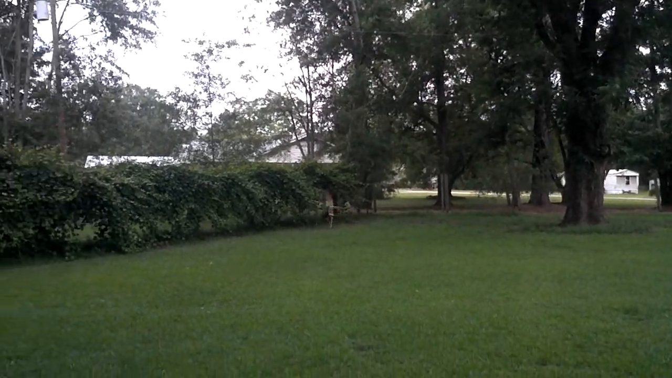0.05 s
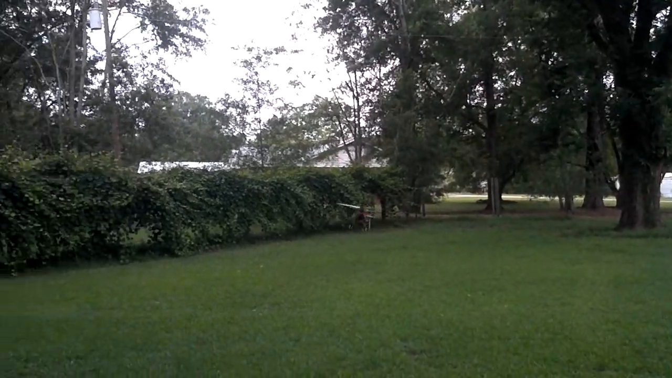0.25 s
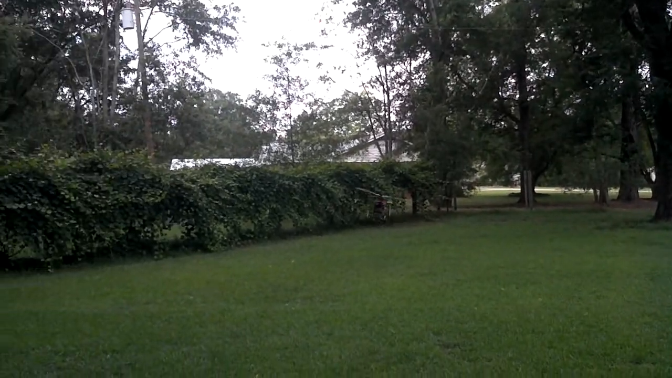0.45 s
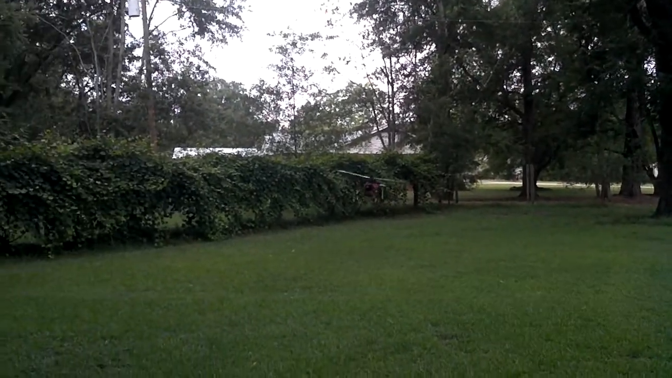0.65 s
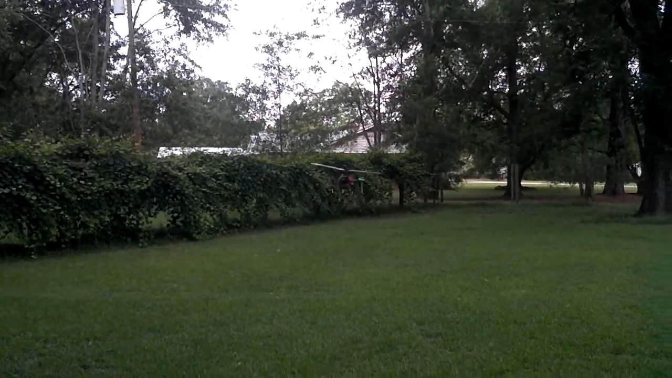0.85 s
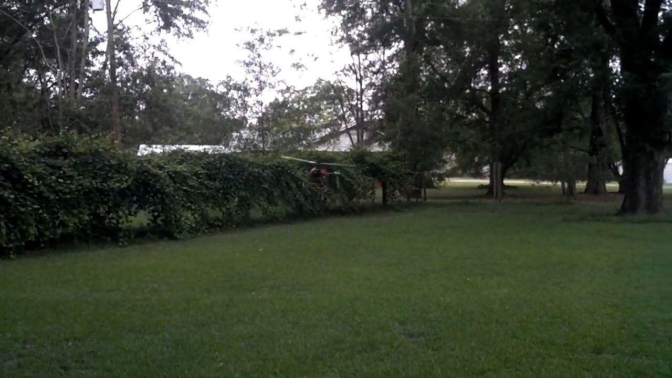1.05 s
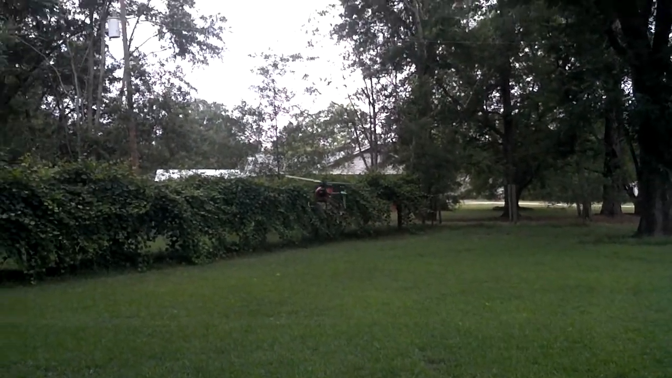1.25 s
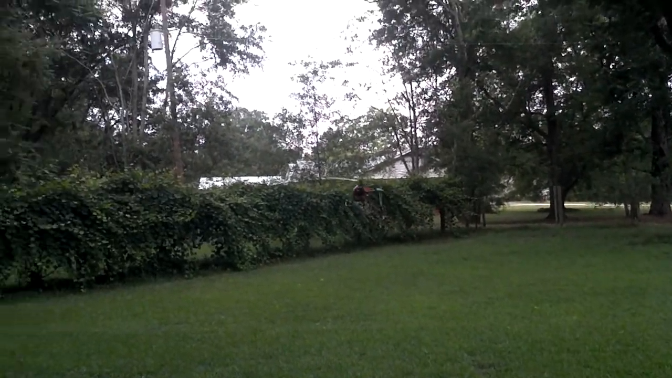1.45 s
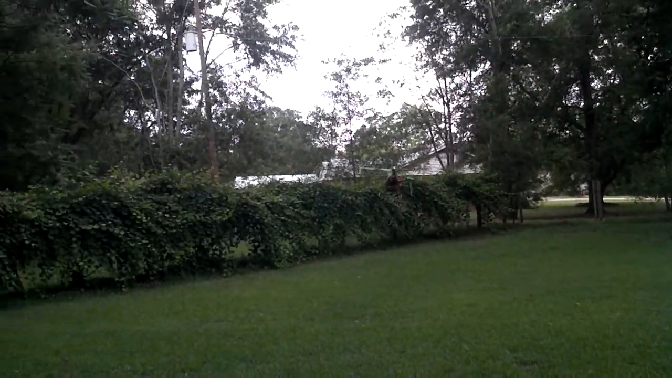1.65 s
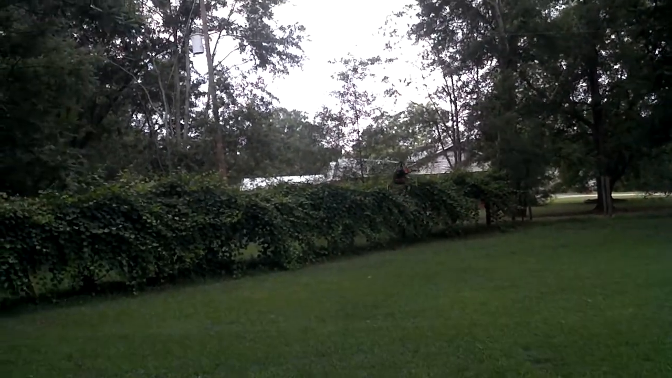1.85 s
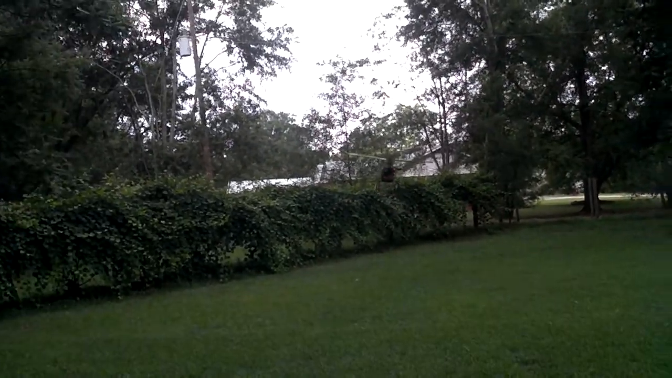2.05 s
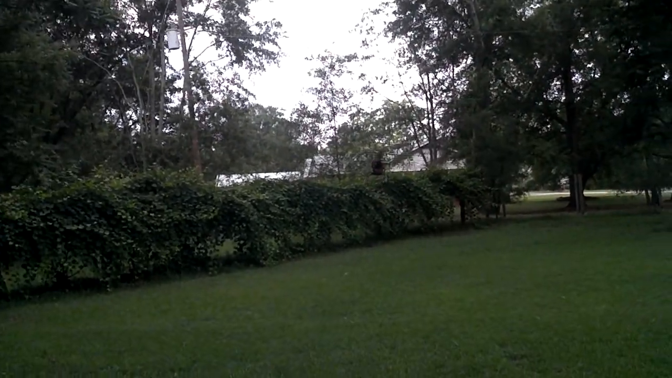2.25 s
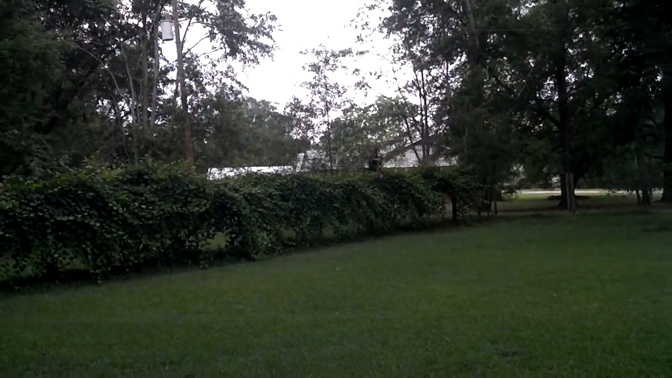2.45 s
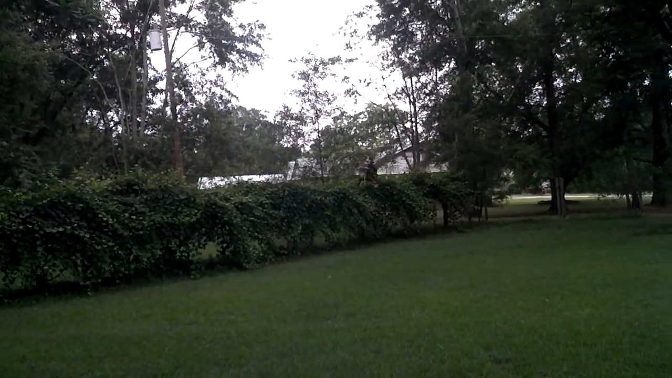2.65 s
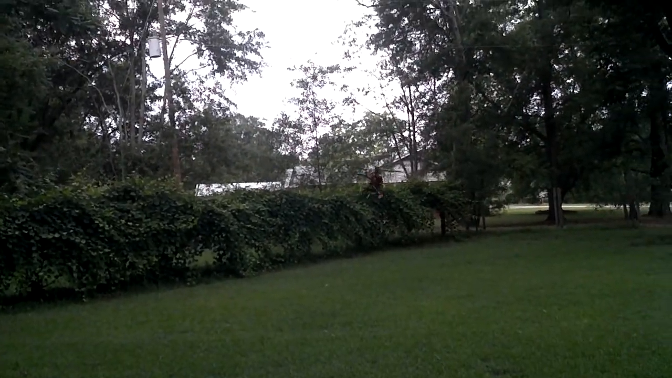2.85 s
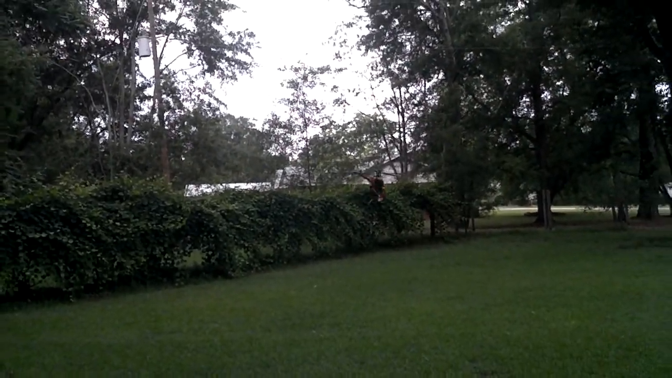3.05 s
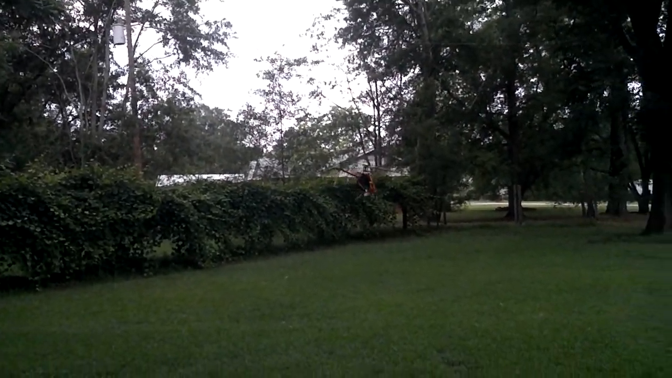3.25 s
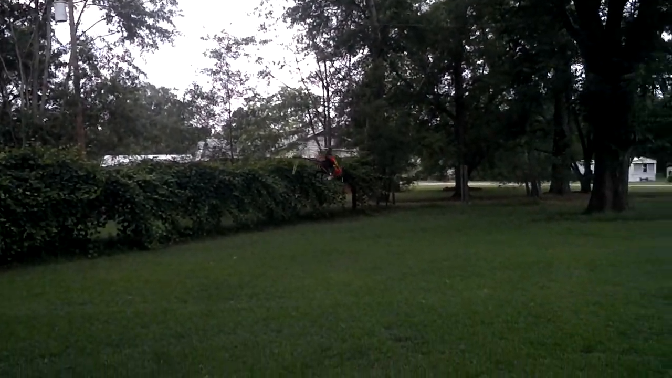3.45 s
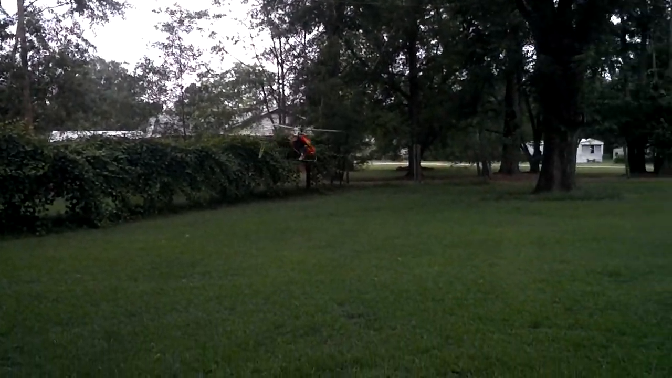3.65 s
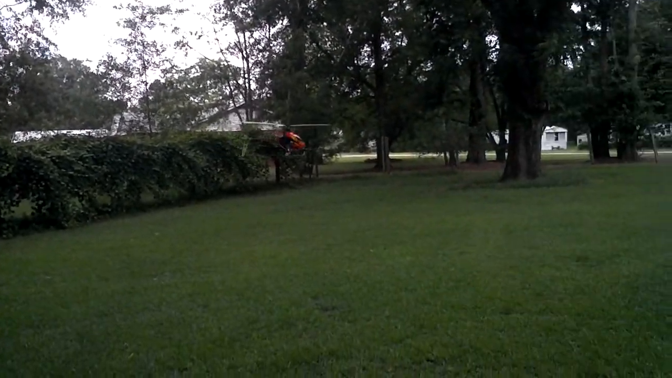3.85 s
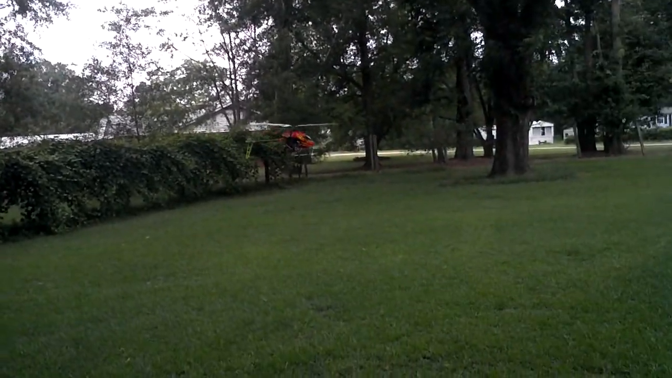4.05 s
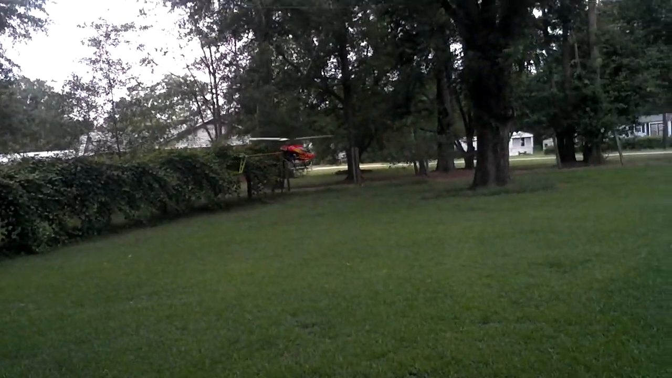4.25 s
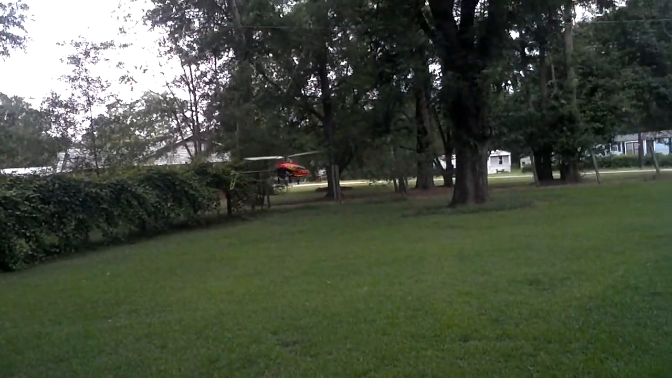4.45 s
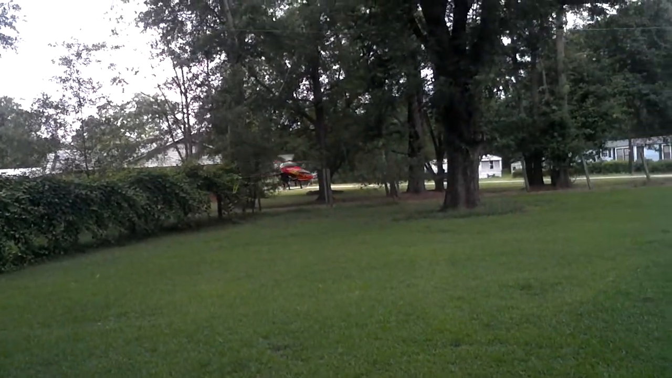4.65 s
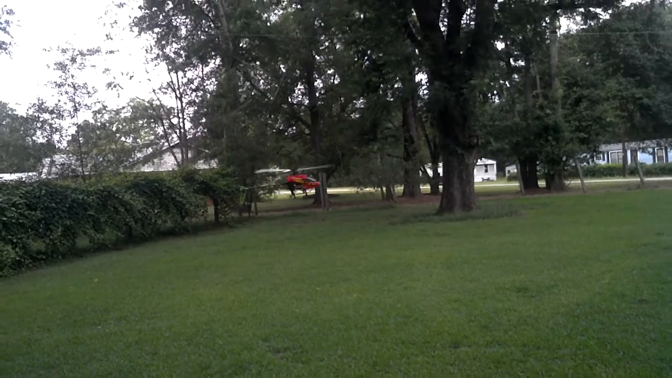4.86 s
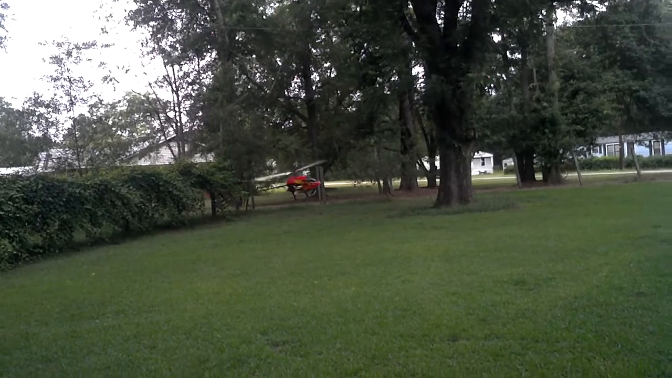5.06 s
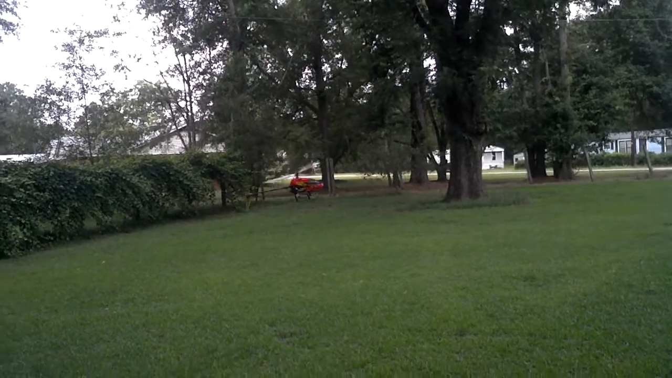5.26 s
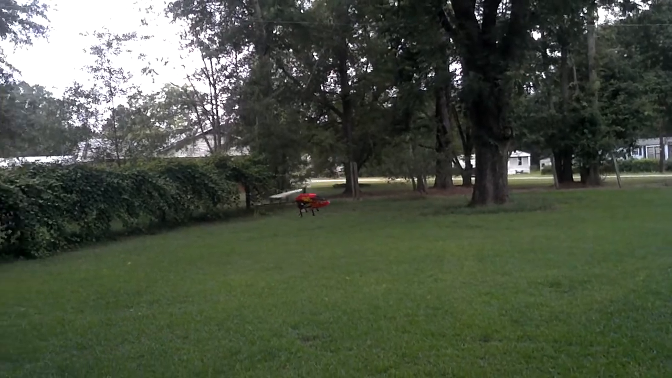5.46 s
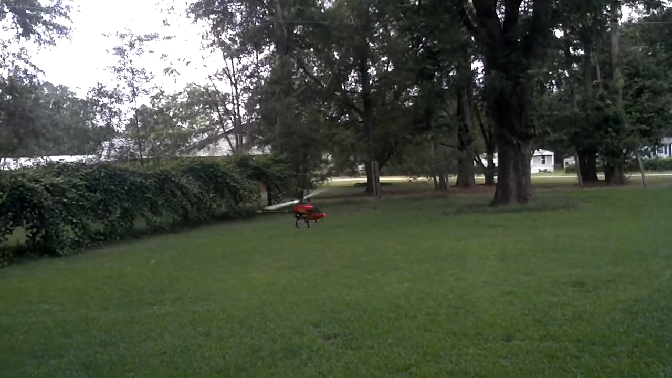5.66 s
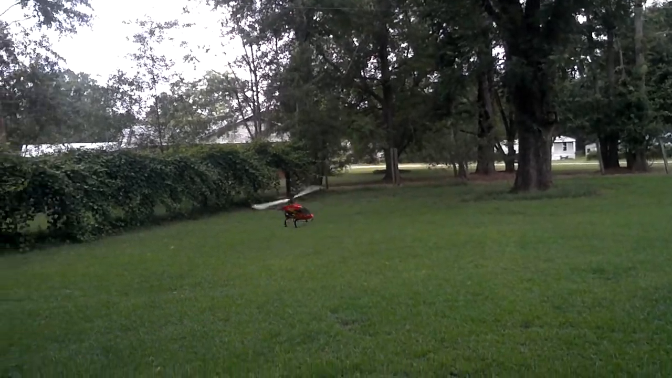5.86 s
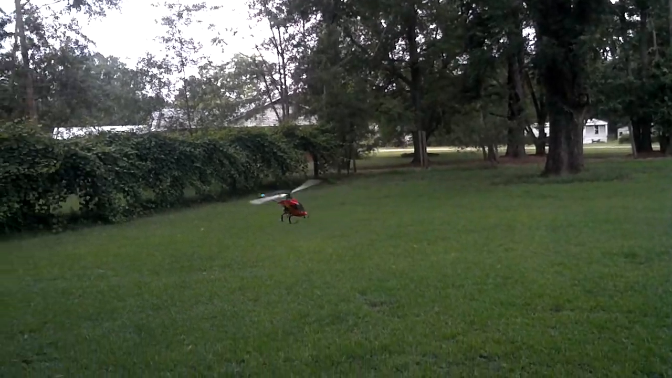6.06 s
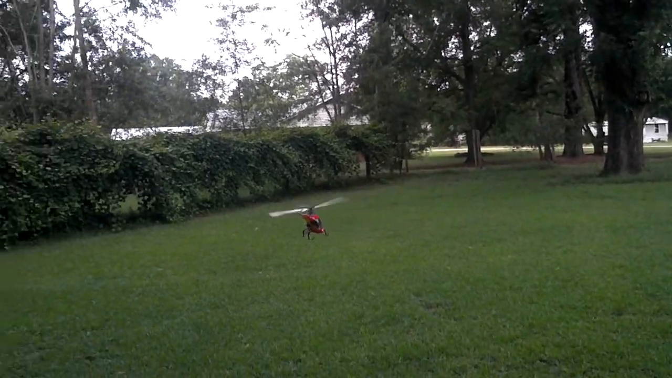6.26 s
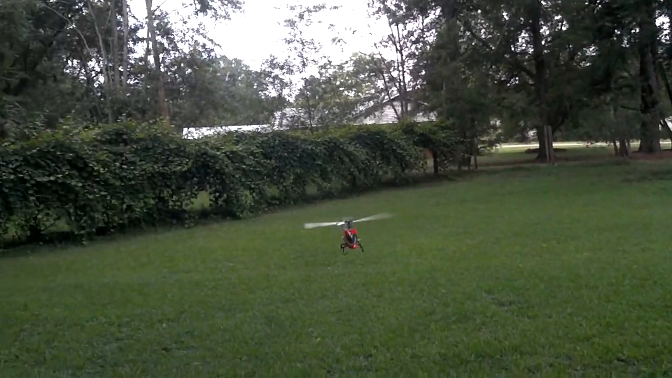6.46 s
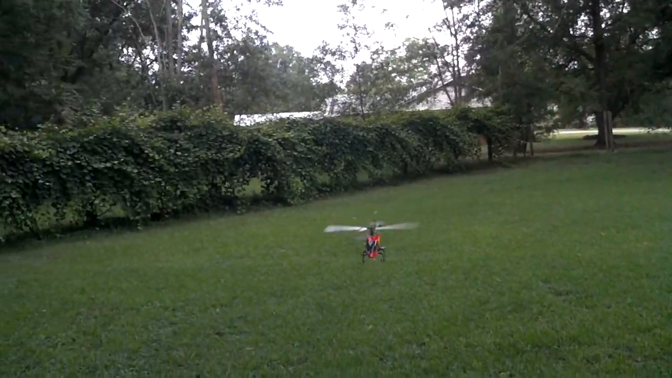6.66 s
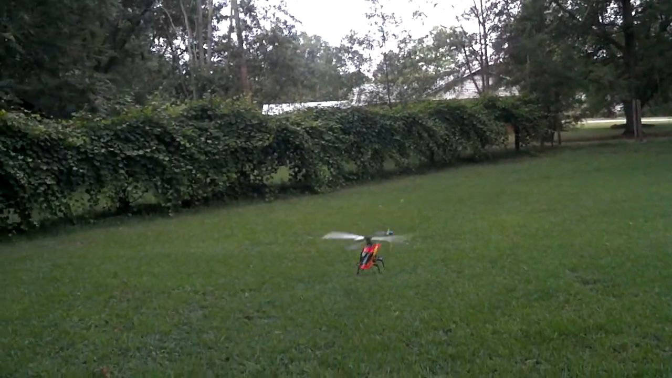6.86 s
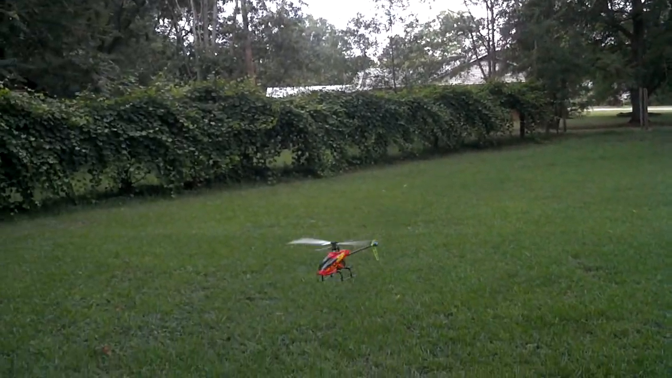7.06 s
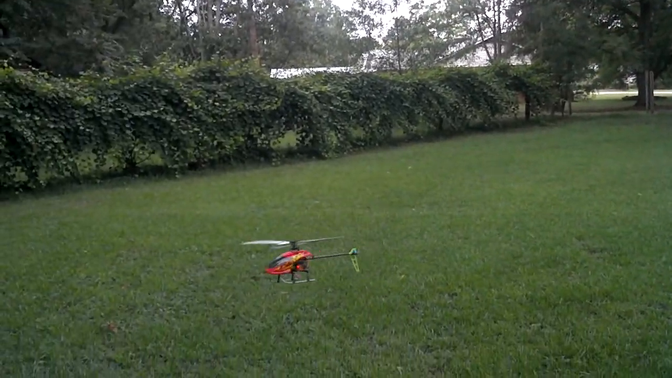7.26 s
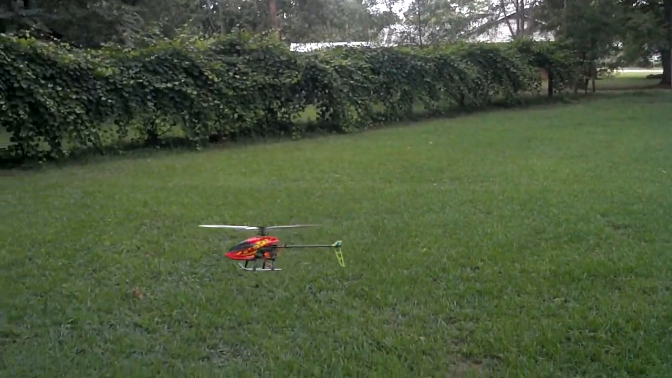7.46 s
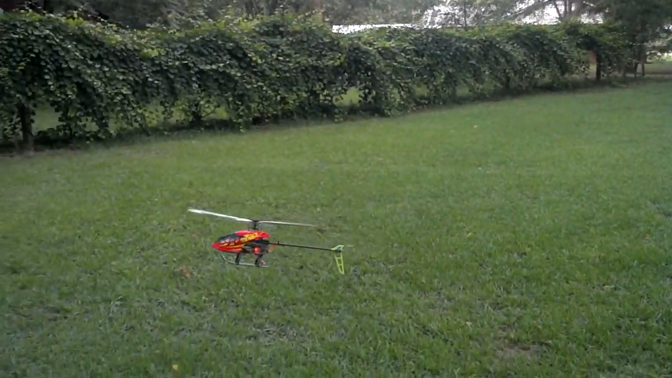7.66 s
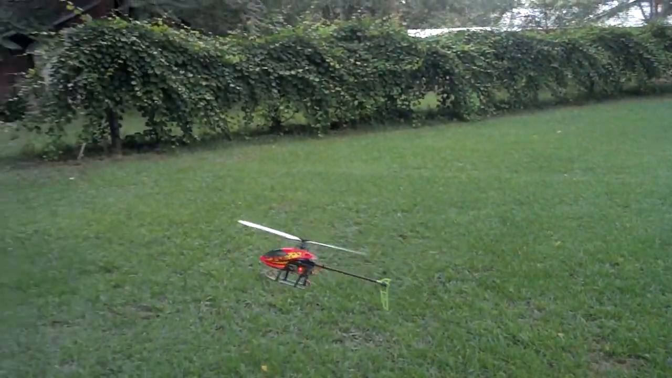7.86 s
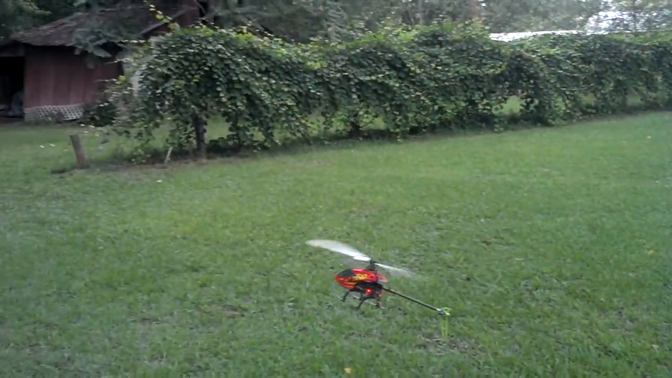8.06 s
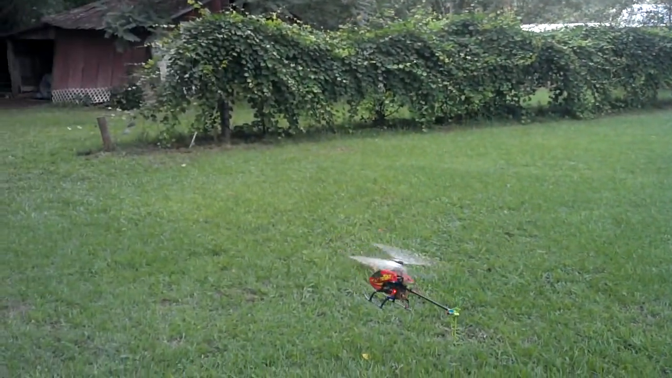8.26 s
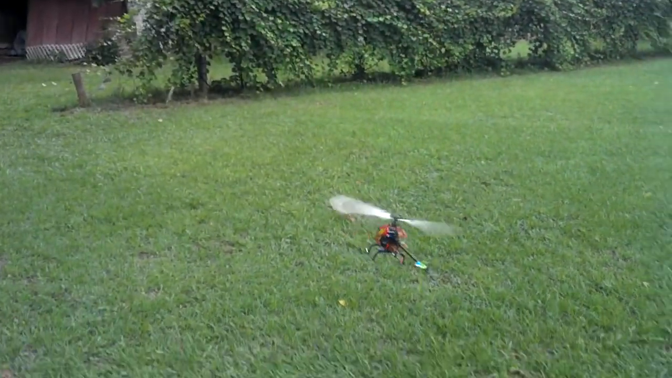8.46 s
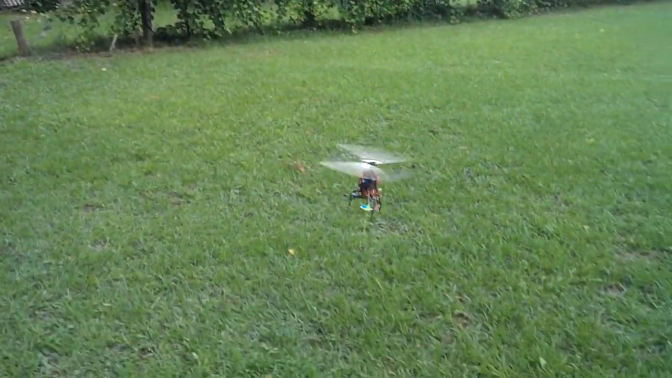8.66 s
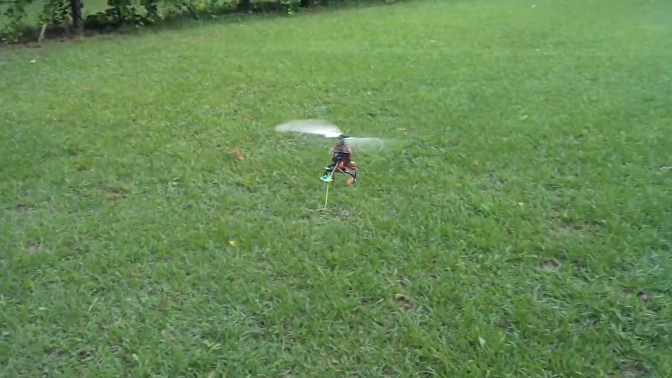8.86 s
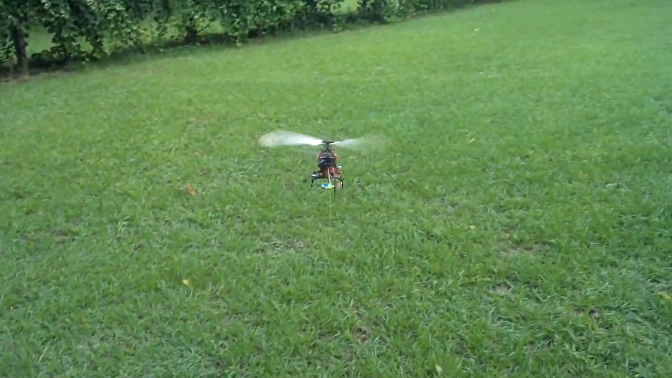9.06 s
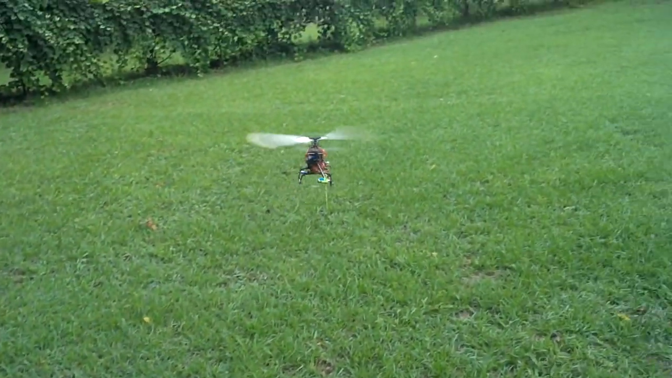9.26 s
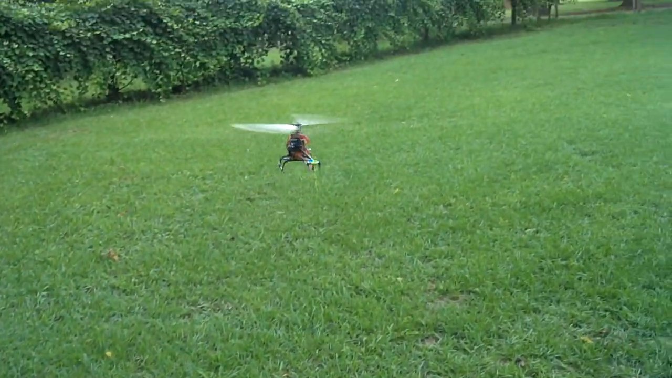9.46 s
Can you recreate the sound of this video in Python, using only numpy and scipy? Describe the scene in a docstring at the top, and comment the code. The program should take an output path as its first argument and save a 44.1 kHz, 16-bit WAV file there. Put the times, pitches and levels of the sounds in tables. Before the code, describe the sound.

Outdoors in a quiet yard, a small electric model helicopter flies continuously. Its shrill, raspy gear whine throbs rapidly with the rotor, while a separate tail-motor hum wavers up and down. It swells, thins as it drifts off, then comes in close and bright, with brief low puffs of air on the microphone and stronger blade swish at the end.

```python
"""A shrill, throbbing whine drifts off and comes close: a small electric model helicopter over a lawn.
Its motor pinion meshes with the main gear, whose uneven pressure makes the whine throb once a rotor turn.
A separate tail motor hums up and down as it holds the heading, and the main blades swish.
Hedge and trees answer faintly, a quiet yard lies behind, and the downwash puffs on the microphone."""
import sys
import numpy as np
from scipy import signal
from scipy.fft import rfft, irfft, next_fast_len
from scipy.io import wavfile
from scipy.ndimage import map_coordinates

SR = 44100
rng = np.random.default_rng(int(sys.argv[2]) if len(sys.argv) > 2 else 0)


def wav_record(signal):
    """Record a signal, one row per channel, as 16-bit PCM in the file named by sys.argv[1]."""
    frames = np.transpose(np.atleast_2d(signal))
    bounded = np.clip(frames, -1, 1)
    # unit amplitude maps onto the largest positive 16-bit level
    quanta = np.round(bounded * 32767).astype(np.int16)
    wavfile.write(sys.argv[1], SR, quanta)


N = 419832

# how the tail rotor and fuselage face the listener: time_s, broadside (0 end-on to 1 broadside)
BROADSIDE = [(0.0, 0.47), (0.76, 0.01), (1.0, 0.5), (1.64, 0.078), (2.68, 0.28), (3.6, 0.76), (3.76, 0.52),
             (4.56, 0.94), (5.8, 0.64), (6.4, 0.75), (7.56, 0.99), (8.04, 0.16), (9.0, 0.32), (9.52, 0.57)]
# level curve of the main blades' wash, and the offset added to it: time_s, relative_db
WASH_LEVEL = [(0.0, -54), (0.92, -56.5), (1.16, -53), (1.64, -50.5), (1.88, -48), (2.4, -50), (2.96, -45),
              (5.2, -58), (6.88, -57), (7.24, -54), (8.24, -51), (8.48, -44.5), (9.0, -40.3), (9.52, -41.8)]
WASH_DB = 5
GEAR_TEETH, PINION_TEETH = 140, 9


def amp(db):
    """The decibel law: 20 dB is a factor of ten in amplitude."""
    return 10 ** (np.asarray(db) / 20)


def unit(x):
    """Normalisation to a root-mean-square of 1."""
    return x / np.sqrt(np.mean(x ** 2) + 1e-20)


def along(points, hz):
    """Interpolation of (frequency, value) points on a logarithmic frequency axis."""
    point_hz, values = np.transpose(points)
    return np.interp(np.log(hz + 1), np.log(point_hz + 1), values)


def curve(rows):
    """Linear interpolation of (time_s, value) rows to one value per sample."""
    time_s, values = np.transpose(rows)
    return np.interp(np.arange(N) / SR, time_s, values)


def wobble(rate):
    """Band-limited random modulation: a smooth curve through rate random knots a second."""
    knots = rng.standard_normal(int(N * rate / SR) + 4)
    coarse = np.arange(0, N, 16)
    return np.interp(np.arange(N), coarse, map_coordinates(knots, [coarse * rate / SR]))


def filtered(x, response):
    """Linear filtering: the spectrum of x times a complex response of frequency."""
    m = next_fast_len(N + SR // 2)
    return irfft(rfft(x, m) * response(np.fft.rfftfreq(m, 1 / SR)), m)[..., :N]


def coloured(x, spectrum):
    """Spectral shaping by (frequency_hz, level_db) points, normalised to rms 1."""
    return unit(filtered(x, lambda hz: amp(along(spectrum, hz))))


def angle(hz):
    """Phase in radians is the running integral of frequency."""
    return 2 * np.pi * np.cumsum(hz) / SR


def skirt(phase, rate):
    """Random quadrature modulation spreads a gliding carrier into noise about rate Hz wide."""
    return wobble(rate) * np.cos(phase) + wobble(rate) * np.sin(phase)


def line(phase, rough, rate):
    """A spectral line: a tone of rms 1 plus its noise skirt, scaled by rough."""
    return np.sqrt(2) * np.cos(phase) + rough * skirt(phase, rate)


def heard_db(end_on_db, broadside_db):
    """Distance and directivity set the level: nearness plus a gain with broadside view."""
    # nearness to the listener: time_s, relative_db
    nearness = [(0.0, -43), (0.52, -41), (1.04, -41), (1.6, -38), (3.08, -34.5), (3.72, -37), (4.6, -38.5),
                (5.64, -42.5), (6.56, -48.5), (7.4, -35.5), (7.88, -29), (8.12, -31.5), (8.32, -29.5),
                (8.64, -33), (8.76, -32.5), (9.52, -34)]
    return curve(nearness) + end_on_db + broadside_db * curve(BROADSIDE)


def frame_level():
    """Common radiation level (dB) of the gear rasp, chatter and motor lines, from distance and facing."""
    return heard_db(2.38, -2.4)


def mesh_whine(shaft, rotor):
    """Gear meshing: teeth sound at the tooth rate, modulated once a turn by an eccentric gear."""
    # whine at the tooth rate: time_s, relative_db
    whine_curve = [(0.0, -45.5), (0.48, -55.5), (0.82, -43.5), (0.9, -49), (1.03, -40), (1.14, -37),
                   (1.175, -44), (1.21, -36.5), (1.26, -48.5), (1.4, -47), (1.47, -39), (1.53, -44.5),
                   (1.62, -42), (1.72, -48.5), (1.9, -42), (2.08, -37.5), (2.4, -35), (2.7, -38.5),
                   (2.92, -36), (3.15, -40), (3.48, -32), (3.72, -37), (3.87, -37.5), (4.12, -41),
                   (4.44, -39), (4.84, -49.5), (4.96, -58), (5.32, -46), (5.6, -57), (5.76, -47),
                   (6.16, -61.5), (6.88, -51.5), (7.08, -60.5), (7.3, -41), (7.7, -40), (8.03, -31),
                   (8.12, -35.5), (8.2, -49), (9.52, -46)]
    # its octave: time_s, relative_db
    octave_curve = [(0.0, -41.5), (0.36, -34), (2.36, -28), (2.88, -38), (3.4, -29.5), (4.4, -33.5),
                    (5.04, -57), (5.68, -36), (6.44, -45), (6.96, -42.8), (7.56, -27.5), (7.76, -39),
                    (8.52, -22), (8.88, -33), (9.52, -25.5)]
    # once-a-turn throb: time_s, depth_db
    throb_curve = [(0, 3), (.4, 2), (1.0, 7.5), (1.2, 7.5), (1.32, 2.5), (1.47, 7.5), (1.85, 6), (2.12, 1),
                   (2.4, .8), (2.7, 4.4), (3.7, 5.2), (4.3, 4), (4.6, 1), (5.6, 1.5), (5.85, 6),
                   (7.45, 6.5), (7.8, 1.5), (8.0, 2.5), (8.15, 8), (8.5, 4), (9.52, 3)]
    flex_rad_per_db = .23  # phase bend of the whine for each dB of throb
    whine_db, octave_db = curve(whine_curve) + 2.06, curve(octave_curve) - 1.5
    throb_db = curve(throb_curve)
    # once a turn the teeth press harder and the pitch slides down,
    # then it snaps back and slides again, more weakly, on the far side; no two turns are alike
    turn = rotor - 1.8
    press = .7 * np.tanh(2.2 * np.cos(turn)) + .25 * np.cos(2 * turn)
    uneven_press = press * (.95 + .17 * wobble(20)) + .16 * wobble(36)
    throb = amp(throb_db * uneven_press - .05 * throb_db ** 2)
    flex = np.maximum(np.cos(turn), -.45 * np.cos(turn)) * (1 + .25 * wobble(28)) + .13 * wobble(90)
    mesh = PINION_TEETH * shaft + flex_rad_per_db * throb_db * flex + .08 * wobble(45)

    fundamental = throb * line(mesh, rough=.15, rate=280) + .22 * skirt(mesh, rate=420)
    octave_db = octave_db + 0.25 * press + 0.49 * np.cos(2 * rotor) + 1.75 * wobble(70)
    third_db = frame_level() - 25 - 9 * curve(BROADSIDE) + 2 * wobble(3) + 3 * press
    whine = amp(whine_db) * fundamental
    whine += amp(octave_db) * line(2 * mesh, rough=0.33, rate=220)
    return whine + amp(third_db) * line(3 * mesh, rough=2, rate=400)


def motor_and_bearings(shaft, rotor):
    """Rotating machinery sounds at multiples of shaft speed: poles, unbalance and bearings."""
    # hum of the three armature poles: time_s, level_db
    hum_curve = [(0.0, -63), (0.52, -64), (0.84, -51.5), (1.56, -60), (2.08, -48), (3.16, -40),
                 (3.72, -49.5), (4.36, -38.5), (5.6, -47.5), (5.84, -65.5), (7.76, -34.5), (8.12, -50),
                 (8.36, -41), (9.24, -45), (9.52, -43)]
    # shrill, rough bearing whine that swells as the motor slows: time_s, mean_level_db
    shrill_curve = [(0, -66), (4.2, -58), (4.6, -45), (5.1, -44), (5.6, -47), (6.1, -62), (9.52, -62)]
    # lesser lines: shaft_multiple, end_on_db (against the frame level), broadside_gain_db
    orders = [(4.5, -28, 0), (6, -30, 2), (6.75, -24, 0), (8, -29, 0), (11.25, -18, -5), (12, -18, -6),
              (13.5, -17, -2), (14.25, -14.5, -4), (15, -12, -3), (15.75, -18, 9), (17, -16, 2),
              (17.5, -15, 0), (18.5, -14, -3), (19, -11.5, -3), (20.25, -19, 2), (21, -21, 2),
              (21.67, -23, -4)]
    sound = amp(curve(hum_curve)) * line(3 * shaft, rough=0.17, rate=34)
    sound += amp(-63.5 + 1.5 * wobble(3)) * line(shaft, rough=.15, rate=20)  # unbalanced shaft
    # a bearing tone, loudest where the blade wash is loudest
    bearing_db = curve(WASH_LEVEL) + WASH_DB - 11 + 2 * wobble(3)
    sound += amp(bearing_db) * line(2.25 * shaft, rough=.4, rate=30)
    rattling = shaft + .04 * wobble(60)  # play in the bearings (radians) blurs the high lines
    frame_db, broadside = frame_level(), curve(BROADSIDE)
    for multiple, end_on_db, gain_db in orders:
        level_db = frame_db + end_on_db + gain_db * broadside + 2 * wobble(1.985) + 2 * wobble(25)
        sound += amp(level_db) * np.sqrt(2) * np.cos(multiple * rattling)
    shrill_db = curve(shrill_curve) + 2.5 * np.cos(rotor)
    return sound + amp(shrill_db) * skirt(7 * 2.25 * shaft, rate=230)


def tooth_chatter(shaft, rotor):
    """Amplitude-modulated narrow-band noise: hiss glides with the motor and bursts once a gear turn."""
    # bands: shaft_multiple, width_hz (approximate), end_on_db (against the frame level),
    # broadside_gain_db, burst_depth_db
    bands = [(15.75, 300, -18, 6, 4), (17.6, 350, -11, -4, 2), (18.5, 420, -8, -9, 2),
             (20.8, 450, -15, -7, 2)]
    frame_db, broadside = frame_level(), curve(BROADSIDE)
    sound = np.zeros(N)
    for multiple, width_hz, end_on_db, gain_db, burst_db in bands:
        steady_db = frame_db + end_on_db + gain_db * broadside
        level_db = steady_db + burst_db * np.cos(rotor) + 1.5 * wobble(3) + 2 * wobble(40)
        sound += amp(level_db) * skirt(multiple * shaft, rate=width_hz)
    return sound


def tooth_rasp(rotor):
    """Surface roughness excites the frame: part of the rasp repeats with every turn of the gear."""
    # spectrum of the rasp: frequency_hz, relative_db
    rasp_spectrum = [(200, -108), (2000, -7), (4400, -28), (5400, -12), (6000, -3), (6500, -2.5), (7100, 0),
                     (7700, 0.5), (8300, -1.5), (8900, -5.5), (10000, -14), (11000, -24), (11800, -15),
                     (15800, -35)]
    flaws = rng.standard_normal(GEAR_TEETH * 10)  # ten points a tooth
    position = rotor / (2 * np.pi) % 1 * len(flaws)
    repeating = map_coordinates(flaws, [position], mode="grid-wrap")
    scrape_db = 0.12 * np.cos(rotor - 1.2) + 1.2 * np.cos(2 * rotor) + 1.4 * wobble(70)
    scrape = (repeating + rng.standard_normal(N)) * amp(scrape_db)
    # the frame rings near 6.4 kHz in short bursts as the gear comes round
    ring_spectrum = [(5400, -64), (6150, -5.0), (6450, 11), (6750, -15.0), (7600, -68)]
    ring = coloured(rng.standard_normal(N), ring_spectrum)
    frame_db = frame_level()
    ring_db = frame_db - 14 + 6.2 * np.cos(rotor + 1.5) + 2.5 * wobble(40)
    return amp(ring_db) * ring + amp(frame_db - 1.2) * coloured(scrape, rasp_spectrum)


def tail_rotor(rotor):
    """Blade-passing harmonics of a small direct-drive propeller, roughened by the main blades' wake."""
    # speed as it works to hold the heading: time_s, blade_passing_hz
    speed_curve = [(0.0, 561), (0.16, 573), (0.48, 509.5), (0.76, 507.6), (1.04, 567.3), (1.84, 510.7),
                   (2.28, 530.6), (2.48, 558.4), (2.84, 529.6), (3.36, 520.2), (4.08, 545), (4.33, 534.4),
                   (4.42, 514.6), (4.69, 530.5), (4.86, 521.5), (4.96, 548), (5.16, 563), (5.85, 544),
                   (6.18, 510.3), (6.48, 544.7), (6.94, 583), (6.99, 601.6), (7.12, 600.6), (7.4, 623.5),
                   (7.56, 622), (7.68, 639), (7.86, 623.5), (8.0, 598), (8.24, 622), (8.56, 571.4),
                   (8.68, 530), (8.84, 500.6), (8.94, 527.7), (9.08, 593.5), (9.32, 551), (9.52, 571)]
    # first harmonic: time_s, relative_db
    hum_curve = [(0.0, -39.5), (0.96, -50.5), (2.28, -37.5), (3.04, -34.5), (4.08, -42.5), (4.32, -53.5),
                 (4.44, -48), (4.68, -57), (5.28, -44.5), (6.04, -44.5), (6.56, -51), (7.0, -43),
                 (7.48, -42), (7.6, -34), (7.84, -34.5), (8.04, -52), (8.2, -36.5), (8.52, -32.5),
                 (9.28, -40.5), (9.52, -35)]
    # third harmonic, which the higher ones follow: time_s, relative_db
    third_curve = [(0, -60), (0.75, -68), (1.0, -56), (1.5, -59.5), (2.6, -59), (2.95, -48), (3.45, -46.5),
                   (3.9, -52.5), (4.35, -41.5), (4.83, -42), (4.88, -48), (4.98, -43), (5.14, -46),
                   (5.2, -51.5), (5.85, -53.5), (6.15, -47.5), (6.45, -66), (6.8, -52), (7.1, -43.5),
                   (7.55, -40.5), (7.9, -44.5), (8.05, -47), (8.3, -46), (8.5, -48), (8.62, -55),
                   (8.88, -50), (9.0, -42.5), (9.07, -50), (9.17, -45), (9.3, -52), (9.52, -51)]
    # spectrum of the blade noise: frequency_hz, relative_db
    air_spectrum = [(100, -49), (700, -12), (1200, 13), (1700, 1), (2300, -17.5), (3300, 7.5), (4400, 8),
                    (6000, 13), (12000, -15)]
    hover_hz, full_hz = 565, 605  # blade rate at no extra effort and at full effort
    fall_db = 12  # fall of the harmonics above the third, per octave
    blade_hz = curve(speed_curve)
    effort = np.clip((blade_hz - hover_hz) / (full_hz - hover_hz), 0, 1)
    # roughest when it pushes hard and is seen broadside
    rough = 0.085 + curve(BROADSIDE) * (0.13 + 0.62 * effort)
    wake = np.cos(2 * rotor - 2)  # one swing for each passing main blade
    blade = angle(blade_hz * (1 + .004 * wobble(35))) + .2 * rough * wake

    second_db = heard_db(-18.5, 10.6) + 2.5 * wobble(16)
    third_db = curve(third_curve)
    hum = amp(curve(hum_curve) - 2.03) * line(blade, rough * .42, rate=140)
    hum += amp(second_db) * line(2 * blade, rough * 1.3, rate=220)
    # upper harmonics flare as each wake passes; turbulence spreads them, and the division offsets its power
    gusts_db = 1.9 * wobble(35) + .8 * wake
    for k in np.arange(3, 10):
        blur = (rough * k) ** 2 * .22 + .17 * (k - 2)
        level_db = third_db - fall_db * np.log2(k / 3) + gusts_db
        hum += amp(level_db) * line(k * blade, blur, rate=240) / np.hypot(1, blur)
    # high whistle of the tail motor
    hum += amp(third_db - 13 + gusts_db) * line(8 * blade, rough=.5, rate=120)
    # the wake doubles harmonics two and three with a tone one main blade rate higher, which beats with them
    for k in range(2, 4):
        sideband = k * blade + 2 * rotor - 2 + .6 * wobble(25)
        hum += amp(third_db - 2) * rough * line(sideband, rough=.3, rate=80)
    chop = amp(3 * rough * (wake - .2))
    gusty_noise = rng.standard_normal(N) * (1 + .5 * np.cos(blade)) * amp(0.51 * wake)
    air = coloured(gusty_noise, air_spectrum)
    return chop * (hum + amp(heard_db(-8, 8.2)) * air)


def main_rotor(rotor):
    """Blade passage modulates broadband noise; low blade-rate harmonics stand out when it is loud."""
    # spectrum of the swish: frequency_hz, relative_db
    wash_spectrum = [(25, -18), (120, -22), (280, -1), (430, -3), (620, 6), (900, 2.5), (1200, 2),
                     (1700, -2.5), (3000, -14.5), (6000, -23)]
    # low buzz: blade_rate_multiple, mean_db (against the swish at average wash level)
    buzz_lines = [(2, -26.5), (3, -28), (4, -22.5), (5, -19.5), (6, -23), (7, -28)]
    wash_db = curve(WASH_LEVEL) + WASH_DB
    excess_db = wash_db - wash_db.mean()
    passing = np.cos(2 * rotor + 2.3)  # two blades
    # louder wash comes in sharper bursts
    bursts_db = (2 * passing + 1.2 * passing ** 2 + 1.5 * wobble(60)) * amp(.25 * excess_db)
    swish = unit(amp(bursts_db) * coloured(rng.standard_normal(N), wash_spectrum))
    buzz = np.zeros(N)
    for k, mean_db in buzz_lines:
        swell = amp(mean_db + 3 * wobble(9))
        buzz += swell * np.sqrt(2) * np.cos(2 * k * rotor + .7 * wobble(18))
    return amp(wash_db) * (swish + amp(.3 * excess_db) * buzz)


def stereo_pair(x):
    """Interchannel phase: alike up to 1500 Hz, then drifting apart in the treble, which sounds wide."""
    # phase between the sides: frequency_hz, left_lead_half_turns
    width = [(0, 0), (1500, 0), (1900, -.2), (2100, -.7), (2500, -.99), (2900, -1), (3100, -.94),
             (3500, -.4), (3900, 0), (4150, .2), (4500, -.65), (5200, -1), (15600, -9)]

    def response(hz):
        lead = np.pi * np.interp(hz, *np.transpose(width))
        return np.exp(.5j * np.array([lead, -lead]))

    return filtered(x, response)


def trees(x):
    """Diffuse scattering: convolution with decaying noise, different on each side, for hedge and trees."""
    # decay: frequency_hz, t60_s
    decay = [(200, 0.13), (2000, 0.018), (12000, 1)]
    hz, t, z = signal.stft(rng.standard_normal((2, SR // 2)), SR, nperseg=256)
    fade_db = -60 * t / along(decay, hz)[:, None]
    tail = signal.istft(z * amp(fade_db), SR, nperseg=256)[1]
    delayed = np.pad(x, (600, 0))[None]  # 600 samples of travel
    return signal.fftconvolve(delayed, tail / np.linalg.norm(tail[0]), axes=1)[:, :N]


def puffs():
    """Turbulent pressure in near antiphase: downwash pushes on one microphone port as it pulls on the other."""
    # Gaussian gusts: centre_s, peak_db, spread_s, alike_share (reaches both ports alike)
    gusts = [(6.62, -60, .1, .05), (7.44, -51, .05, .02), (7.5, -42, .005, .02), (7.541, -33, .009, .22),
             (7.6, -42, .012, .02), (7.66, -49, .035, .02), (7.875, -41, .008, .05)]
    t = np.arange(N) / SR
    opposed = np.array([[1], [-1]])
    push = np.zeros((2, N))
    for centre_s, peak_db, spread_s, alike in gusts:
        push += amp(peak_db) * np.exp(-.5 * ((t - centre_s) / spread_s) ** 2) * (opposed + alike)
    rumble_spectrum = [(25, -30), (65, -1.5), (110, 5), (170, -1), (350, -35), (1000, -80)]
    rumble = coloured(rng.standard_normal(N), rumble_spectrum)
    return (push + amp(-62.5 + 2.5 * wobble(6.6)) * opposed) * rumble


def yard():
    """Ambient noise: quiet outdoor air and a steady hum; a deeper hum stops after about a second."""
    # spectrum of the air: frequency_hz, relative_db
    air_spectrum = [(25, -40), (65, 10), (120, 20.5), (200, 19.5), (500, 21.5), (1500, -60), (3000, -76),
                    (15000, -40)]
    air = coloured(rng.standard_normal((2, N)), air_spectrum)
    hum = line(angle(np.full(N, 119.5)), rough=0.76, rate=14)
    deep_hum = line(angle(np.full(N, 66)), rough=.2, rate=8)
    deep_db = curve([(0, -77), (1.12, -69), (1.2, -100)])
    return amp(-58.0) * air + amp(-72.0) * hum + amp(deep_db) * deep_hum


def scene():
    """Gear ratio and superposition: the shaft drives the rotor, and all parts sound from one spot."""
    # speed of the main motor: time_s, shaft_hz
    shaft_curve = [(0.05, 457.5), (0.25, 455.0), (0.37, 448.9), (0.49, 440.1), (0.77, 430.1), (1.05, 432.0),
                   (1.21, 436.9), (1.33, 437.2), (1.45, 432.6), (1.77, 426.2), (2.05, 418.2), (2.29, 417.3),
                   (2.45, 425.4), (2.93, 429.3), (3.89, 430.5), (4.09, 426.8), (4.37, 417.2), (4.65, 410.7),
                   (4.85, 410.2), (5.09, 418.6), (5.41, 424.8), (5.89, 426.6), (6.05, 425.1), (6.69, 429.9),
                   (6.89, 429.8), (7.05, 426.2), (7.29, 424.3), (7.73, 422.8), (7.93, 422.6), (8.09, 436.7),
                   (8.41, 448.7), (8.81, 456.1), (9.01, 462.1), (9.49, 461.4)]
    shaft = angle(curve(shaft_curve))
    rotor = shaft * PINION_TEETH / GEAR_TEETH
    drive = mesh_whine(shaft, rotor) + motor_and_bearings(shaft, rotor)
    drive += tooth_chatter(shaft, rotor) + tooth_rasp(rotor)
    helicopter = drive + tail_rotor(rotor) + main_rotor(rotor)
    direct = stereo_pair(helicopter) * amp([[-.3], [.3]])  # right side slightly louder
    echo = amp(-31) * trees(helicopter)
    return direct + echo + yard() + puffs()


def record(dry):
    """Band limiting: the recorder cuts the deep bass and keeps nothing above its top frequency."""
    low_cut_hz, top_hz = 55, 15800
    return filtered(dry, lambda hz: (hz < top_hz) / np.sqrt(1 + (low_cut_hz / (hz + 1)) ** 6))


dry = scene()
out = record(dry)
wav_record(out)
```